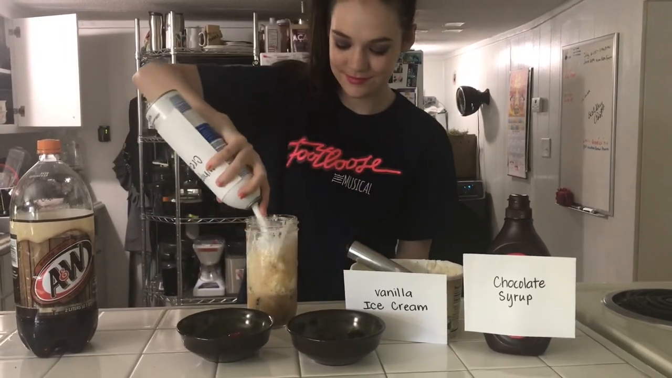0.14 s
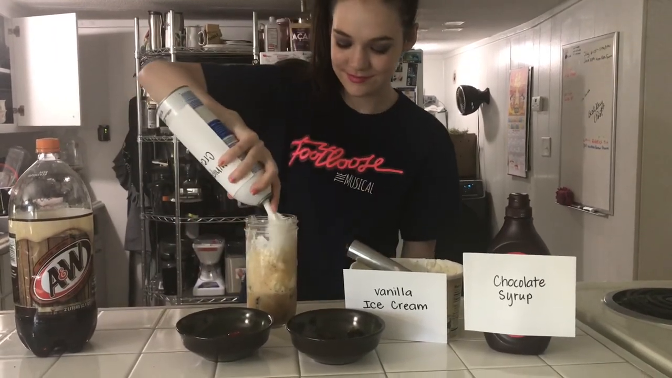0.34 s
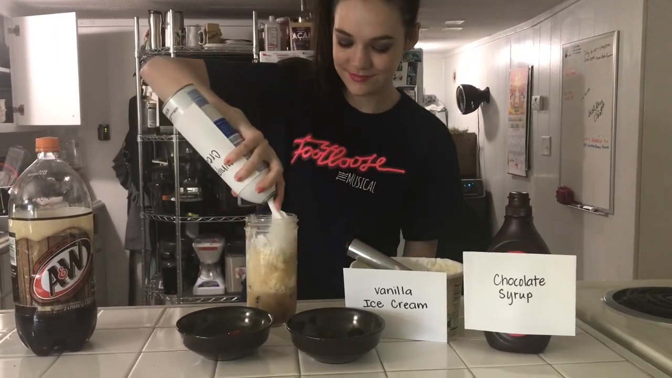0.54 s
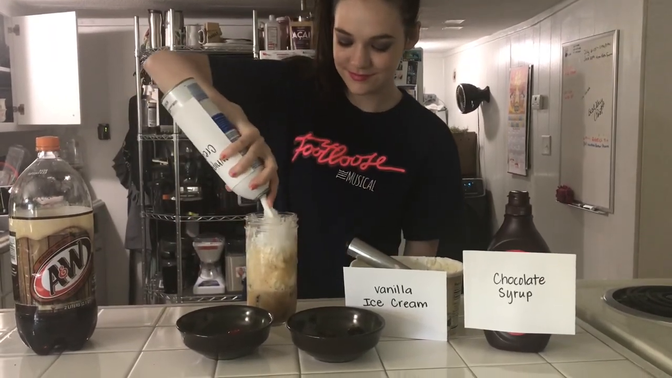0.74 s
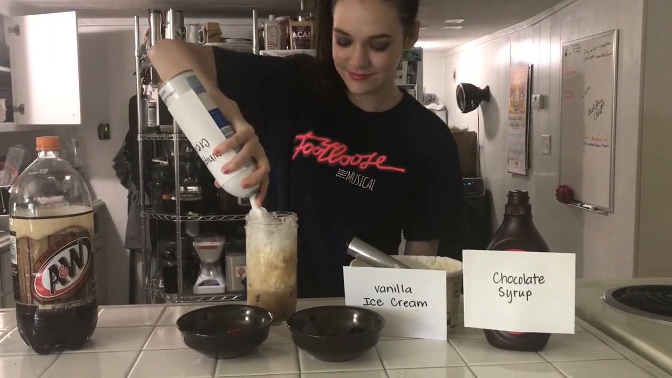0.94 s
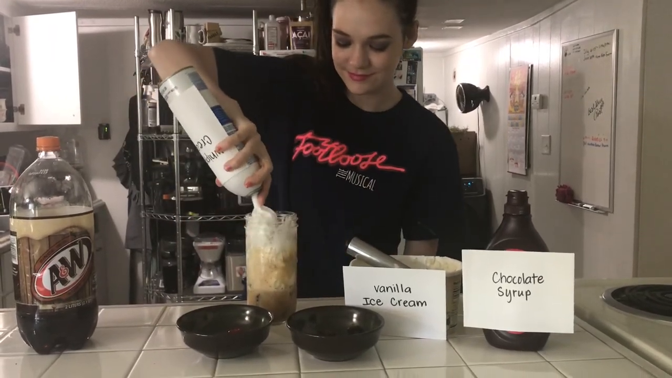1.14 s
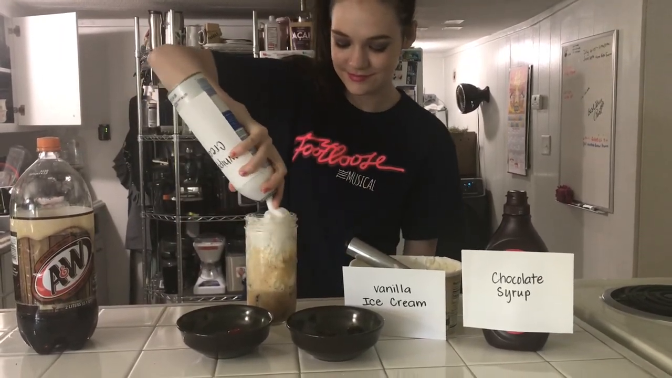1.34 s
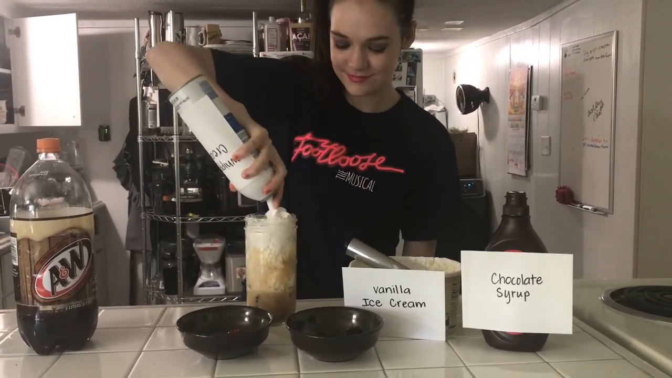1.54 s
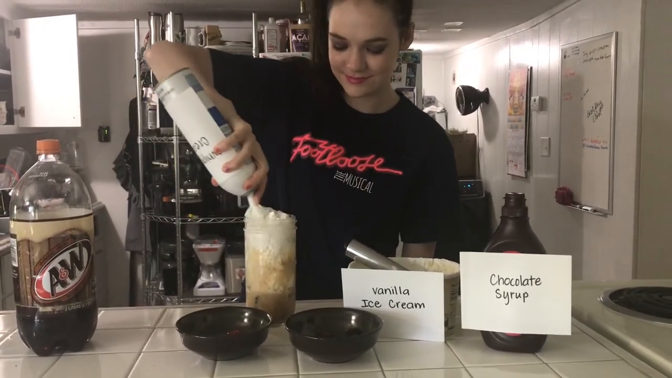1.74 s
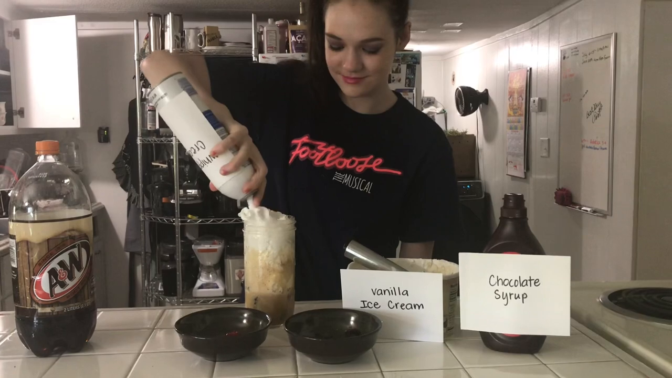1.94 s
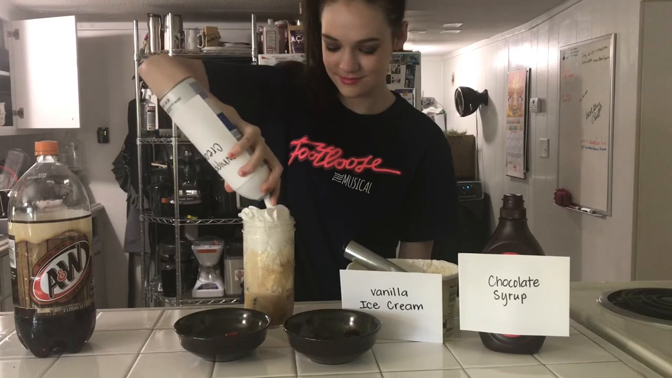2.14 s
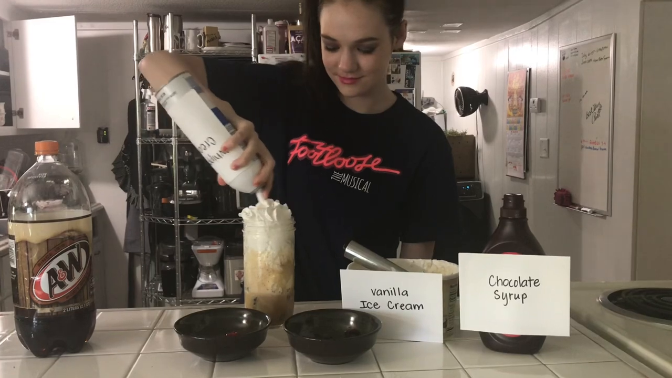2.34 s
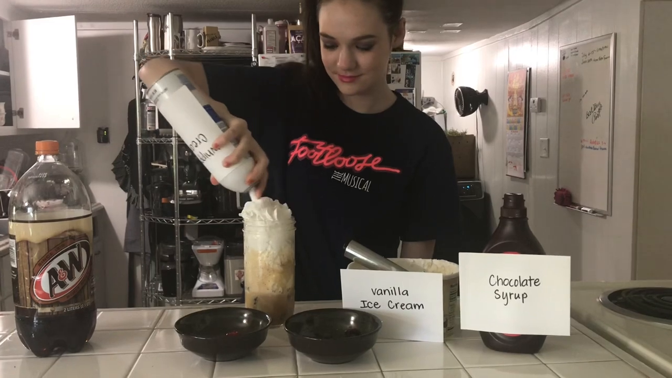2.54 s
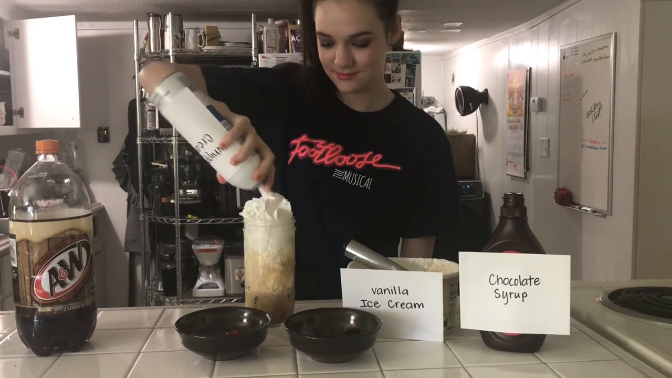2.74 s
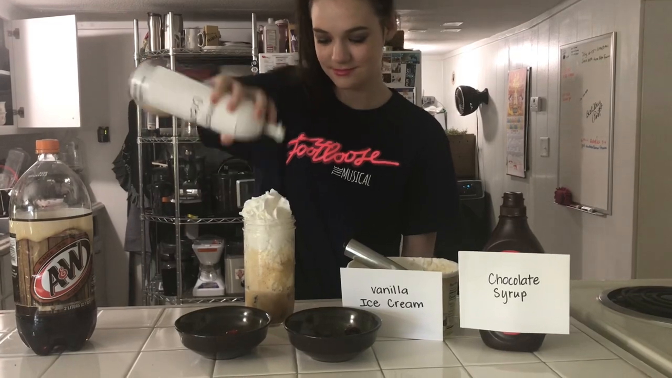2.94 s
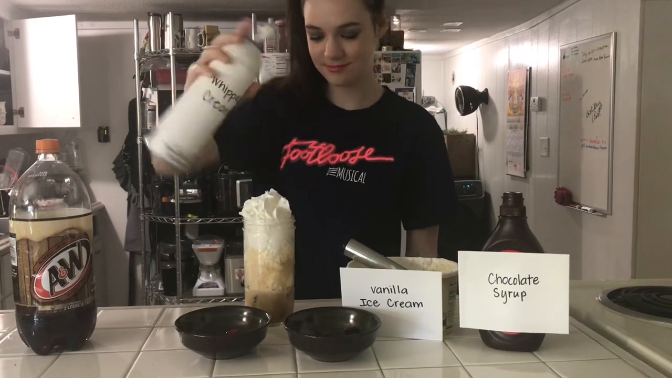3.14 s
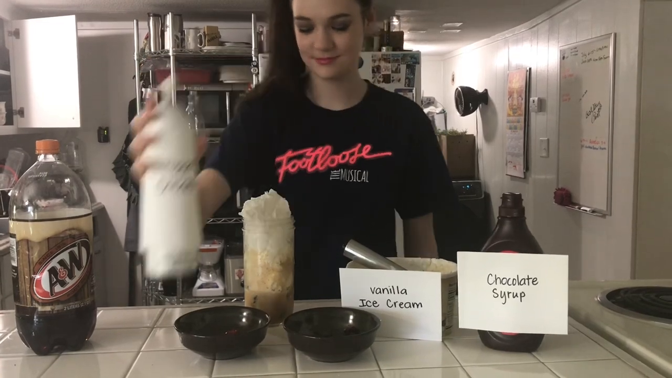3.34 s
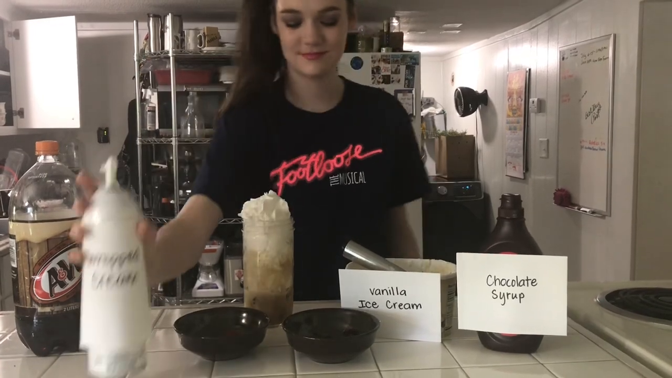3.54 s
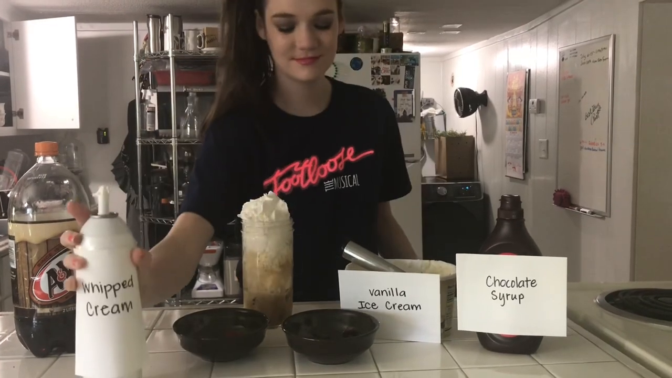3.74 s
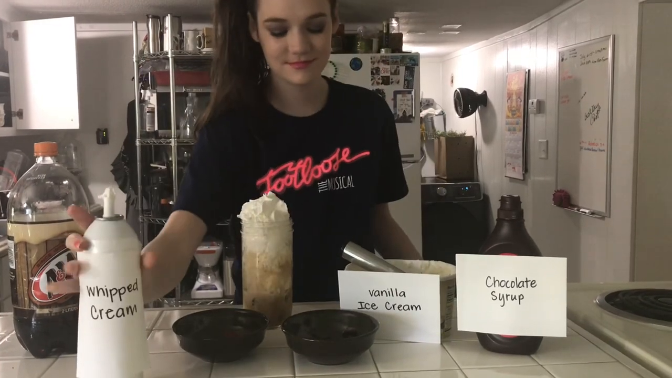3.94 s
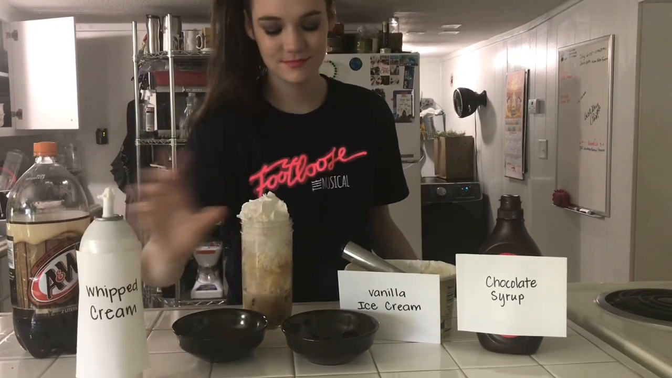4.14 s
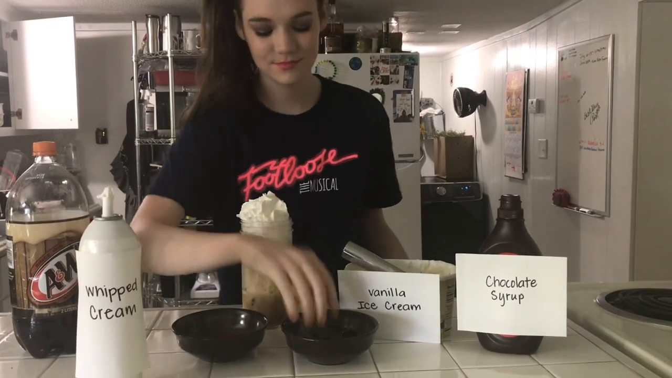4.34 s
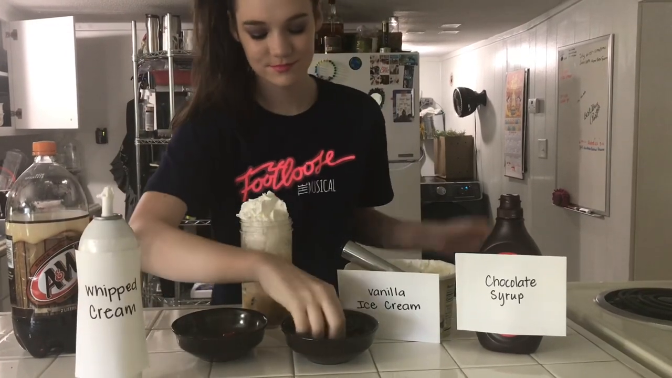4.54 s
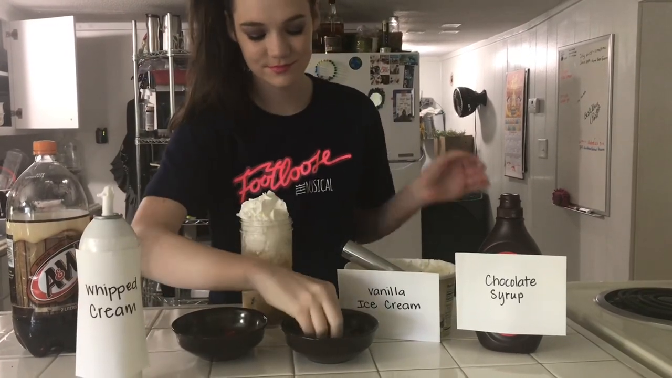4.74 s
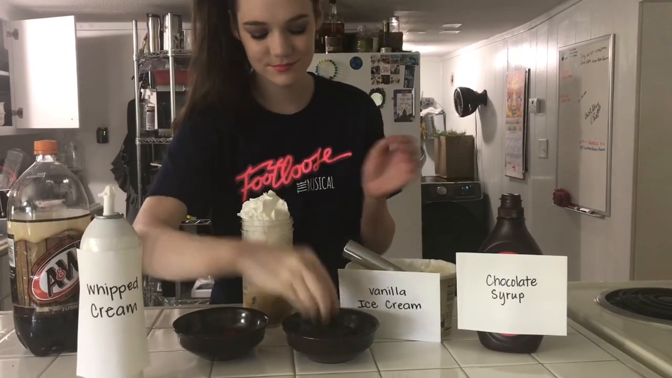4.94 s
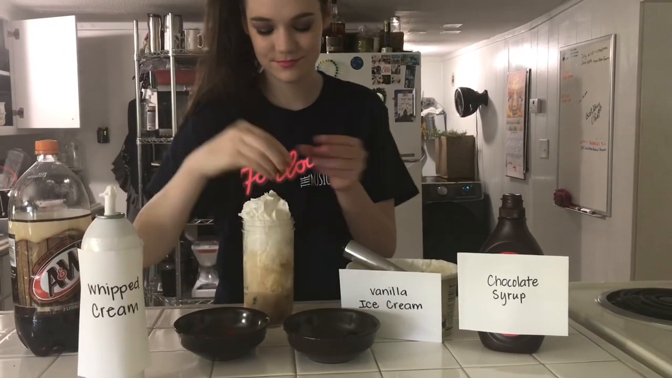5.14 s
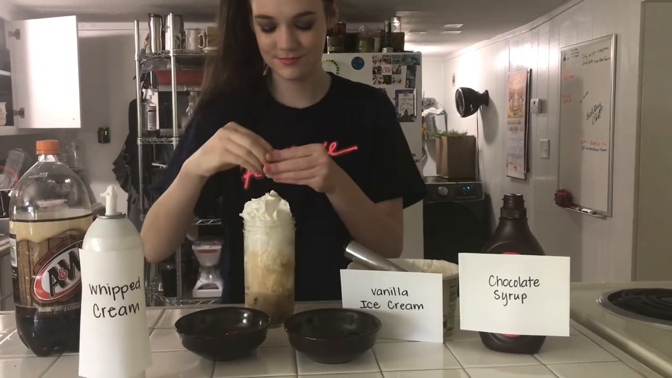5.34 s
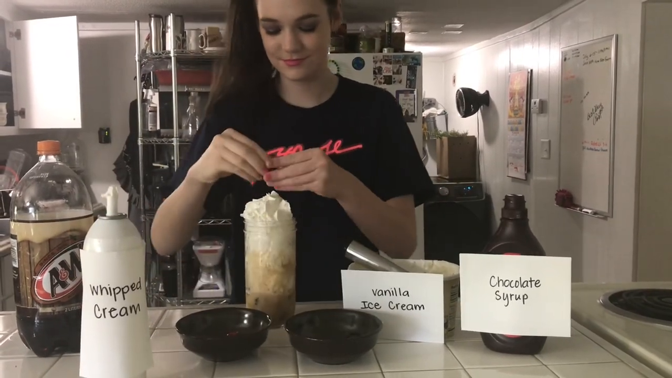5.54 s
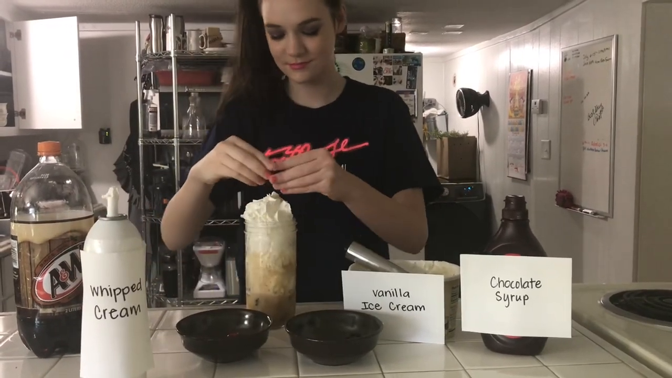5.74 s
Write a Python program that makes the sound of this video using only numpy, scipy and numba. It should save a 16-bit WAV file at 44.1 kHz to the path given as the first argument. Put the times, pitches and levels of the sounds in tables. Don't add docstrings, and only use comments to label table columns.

```python
import sys
import numpy as np
from scipy import signal
from scipy.fft import rfft, irfft, next_fast_len
from scipy.io import wavfile
from numba import njit

SR = 44100
rng = np.random.default_rng(int(sys.argv[2]) if len(sys.argv) > 2 else 0)


def to_wav(sig):
    pcm = np.clip(np.atleast_2d(sig), -1, 1) * 32767
    pcm = np.round(pcm).astype(np.int16)
    wavfile.write(sys.argv[1], SR, pcm.T)


def magnitude_from_level(level_db):
    exponent = np.asarray(level_db, float) / 20
    return 10 ** exponent


N = 259749


def rms_one(x):
    return x / np.sqrt(np.mean(x ** 2) + 1e-20)


def at_hz(points, hz):
    table_hz, values = np.transpose(points)
    return np.interp(np.log(hz + 1), np.log(table_hz), values)


def bumps_db(peaks, hz):
    return sum(db / (1 + (2 * (hz - centre) / width) ** 2) for centre, width, db in peaks)


def filtered(x, order, hz, kind="low"):
    return signal.sosfilt(signal.butter(order, hz, kind, fs=SR, output="sos"), x)


def coloured(x, gain_at):
    size = next_fast_len(len(x))
    hz = np.arange(size // 2 + 1) * SR / size
    return irfft(rfft(x, size) * gain_at(hz), size)[:len(x)]


def drift(rate_hz, size=N):
    r = np.exp(-2 * np.pi * rate_hz / SR)
    settle = 20000
    wander = signal.lfilter([1], [1, -2 * r, r * r], rng.standard_normal(size + settle))
    return rms_one(wander[settle:])


def strike(times_s, levels_db, modes, contact_hz=15000, swing=-1):
    at = (np.array(times_s) * SR).astype(int)
    span = SR // 2
    clicks = np.full(span, 1e-18)
    clicks[at - at[0]] = magnitude_from_level(levels_db)
    rings = 0
    for k, (hz, db, t60_s) in enumerate(modes):
        r, w = magnitude_from_level(-60 / (t60_s * SR)), 2 * np.pi * hz / SR
        gain = swing ** k * magnitude_from_level(db) * np.sin(w)
        rings = rings + signal.lfilter([0, gain], [1, -2 * r * np.cos(w), r * r], clicks)
    out = np.zeros(N)
    out[at[0]:at[0] + span] = filtered(rings, 2, min(contact_hz, 20000))
    return out


@njit
def moving_resonance(x, cos_w, r):
    y = np.zeros(len(x))
    for i in range(2, len(x)):
        drive = (1 - r * r) / 2 * (x[i] - x[i - 2])
        y[i] = drive + 2 * r * cos_w[i] * y[i - 1] - r * r * y[i - 2]
    return y


# hz, density_db
HUM_COLOUR = [(18, -34.5), (32, -6), (45, -1.5), (130, -3.5), (250, -6.5), (340, -9.5), (520, -17),
              (950, -12.5), (1400, -17.5), (2300, -20), (4400, -29), (5500, -33), (9000, -36),
              (16500, -42.5)]


def hum():
    air = rms_one(coloured(rng.standard_normal(N), lambda hz: magnitude_from_level(at_hz(HUM_COLOUR, hz))))
    mains_hz = 118
    tone = np.sin(2 * np.pi * mains_hz * np.arange(N) / SR + 1.94 * drift(3.9))
    air_db = -52 + 0.52 * drift(2.4)
    tone_db = -59.5 + 2 * drift(8.6)
    return magnitude_from_level(air_db) * air + magnitude_from_level(tone_db) * tone


# hz, t60_s
KITCHEN_T60 = [(100, .5), (500, .5), (1500, 0.49), (4000, 0.37), (8000, 0.28), (15000, 0.25)]
# hz, level_db
KITCHEN_COLOUR = [(100, -6.5), (1500, -2), (4000, -4.5), (8000, -1), (15000, -10)]


def kitchen(x):
    t = np.arange(SR // 2) / SR
    tail = 0
    edges_hz = 60 * 2 ** np.arange(10.)
    for low, high in zip(edges_hz, np.minimum(edges_hz[1:], 20000)):
        band = filtered(rng.standard_normal(len(t)), 2, [low, high], "band")
        hz = np.sqrt(low * high)
        tail = tail + band * magnitude_from_level(at_hz(KITCHEN_COLOUR, hz) - 60 * t / at_hz(KITCHEN_T60, hz))
    tail = tail * (1 - np.exp(-(t / 0.012) ** 2))
    return signal.fftconvolve(x, magnitude_from_level(-9) * tail / np.sqrt(np.sum(tail ** 2)))[:N]


# delay_s, level_db
ECHOES = [(.0045, -9.5), (0.0103, -11), (0.0121, -12.5), (0.0177, -11.5), (.0215, -18), (.028, -14)]


def wall_echoes(x):
    dull = filtered(x, 1, 6600)
    return sum(magnitude_from_level(db) * np.roll(dull, int(delay_s * SR)) for delay_s, db in ECHOES)


# start_s, ring_db, thud_db
TOUCHES = [
    (4.5765, -51.5, -38),
    (4.594, -70, -35.5),
    (4.599, -72, -33.5),
    (4.616, -69.5, -34),
    (4.657, -63, -57.5),
    (4.715, -66, -58.5),
]
# hz, level_db, t60_s
BOWL_MODES = [(6440, 4.5, 0.025), (6450, -20, 0.2), (8350, -3, 0.03), (8870, -5, 0.0182),
              (10756, -3, 0.0304), (12500, -3.5, 0.00403), (15000, 0.5, 0.00403)]
# hz, level_db, t60_s
THUD_MODES = [(161, -1, 0.019), (338, -4, 0.02112), (587, -4.5, 0.022), (940, 1, 0.016),
              (1424.1, 0.5, 0.024)]


def bowl():
    start_s, ring_db, thud_db = np.transpose(TOUCHES)
    ring = strike(start_s, ring_db, BOWL_MODES)
    return ring + strike(start_s, thud_db - 6.0, THUD_MODES, contact_hz=1699)


# time_s, level_db
SLIDE_STROKE = [
    (4.03, -73),
    (4.07, -50),
    (4.104, -73.5),
    (4.12, -68.5),
]


def slide():
    time_s, level_db = np.transpose(SLIDE_STROKE)
    grains = rng.standard_normal(N) * magnitude_from_level(2.583 * drift(300))
    rub = rms_one(filtered(grains, 3, 4600, "high"))
    return rub * magnitude_from_level(np.interp(np.arange(N) / SR, time_s, level_db, left=-120, right=-120))


# start_s, shell_db, shell_pitch_factor, counter_db, crack_db
KNOCKS = [
    (3.8234, -13.5, 1.001, -25, -17),
    (3.825, -24.5, 1.003, -37, -30),
    (3.9632, -35.5, 1.25, -46, -48),
    (3.9653, -25, 0.72, -28.5, -61.5),
]
# hz, level_db, t60_s
SHELL_MODES = [(1350, -5.5, 0.018), (1581.3, 2, 0.0079), (1870, 4.5, 0.0086), (2140, -2, 0.0141),
               (2800, -9, 0.0074), (4280, -10, 0.023), (6300, -3.5, 0.0053), (8400, 4, 0.0073)]
# hz, level_db, t60_s
COUNTER_MODES = [(60.1, -14, 0.24), (80, -11, 0.17), (119, -8, 0.28), (190.6, -8, 0.26),
                 (267.87, -4.5, 0.064), (379, -13, 0.13), (483, -16.5, 0.076), (614, -6.5, 0.072),
                 (752, -14, 0.17), (884.4, -10, 0.17), (990, -9, 0.1), (1136, -8.5, 0.13),
                 (1410, -15, 0.19)]


def can_knocks():
    out, t = 0, np.arange(N) / SR
    grit = filtered(rng.standard_normal(N), 1, [4500, 8000], "band")
    for start_s, shell_db, pitch, counter_db, crack_db in KNOCKS:
        modes = [(hz * pitch, db, t60_s) for hz, db, t60_s in SHELL_MODES]
        shell = strike([start_s], [shell_db], modes, contact_hz=3300 * pitch, swing=0.9125)
        shell = filtered(shell, 2, 900 * pitch, "high")
        counter = strike([start_s], [counter_db], COUNTER_MODES, contact_hz=1787)
        crack_t60_s = 0.0032
        crack_fall_db = 60 * np.maximum(t - start_s, 0) / crack_t60_s
        crack = grit * (t >= start_s) * magnitude_from_level(crack_db - crack_fall_db)
        out = out - shell + counter + crack
    return out


# start_s, peak_db, centre_hz
POPS = [
    (3.2155, -40.5, 8500),
    (3.218, -49, 7160),
    (3.2225, -57, 6497),
    (3.2408, -46, 12000),
    (4.0633, -55, 12000),
    (4.65, -65, 14000),
]


def pops():
    out = 0
    for start_s, peak_db, hz in POPS:
        modes = [(0.48 * hz, -4, .002), (0.75 * hz, -2, .002), (hz, .1, .0015),
                 (min(1.6 * hz, 15500), -2, .0012)]
        out = out + strike([start_s], [peak_db + 6], modes)
    return out


# time_s, flow_db (as hiss), cream_share_db
FLOW = [
    (0, -38, -1),
    (.45, -36.5, 0),
    (.69, -39.5, -0.5),
    (1.1, -35.5, -.5),
    (1.52, -36, 1),
    (1.77, -40, 1.5),
    (2.1, -31.5, -1),
    (2.44, -37.5, .5),
    (2.65, -32, -3),
]
# hz, density_db
SPRAY_COLOUR = [(200, -4), (350, -2), (600, -0.5), (1200, -1), (1700, -4), (2800, 0), (4300, -2),
                (5300, -2.5), (6800, 3), (8500, 2.5), (10000, -5.5), (11800, -16.5), (14000, -17),
                (16500, -12.5)]
# hz, width_hz, boost_db
GLASS_CAVITIES = [(685, 110, 6.5), (925, 31, 10.5), (1157.2, 110, 6.5), (2016, 49, 4.5), (2440, 60, 5.5),
                  (3000, 99, 2), (4060, 700, 5), (5170, 524, -3), (6860, 954, -7)]
# start_hz,
# sag_hz_per_s (negative sinks), boost_db, extra_at_first_db, fade_s, trend_db_per_s
RESONANCES = [
    (3303, -6, 1, 3.5, .3, -4),
    (9420, -350, 5, 4, 0.23, -2),
    (13800, -780, 3.5, -3, .3, -1),
    (6920, .1, 14, -17, 0.62, -4.2),
    (1930, 28, -17.5, -5, .3, 5),
]
RESONANCE_WIDTHS_HZ = [356, 890, 2003, 449.5, 406]
ZONE_EDGES_HZ = [150, 1500, 5000, 10400, 17000]
# level_db, follows_flow, follows_cream, extra_at_first_db, foam_build_s, trend_db_per_s
ZONES = [
    (-41.5, 0.14, -0.19, -8, 0.2, -0.24),
    (-38, 0.72, 0.66, -10.5, 0.28, 0.56),
    (-35, .99, 1, 1.2, .3, 0.54),
    (-33.5, 0.53, -0.42, -2.5, .05, -1.85),
]


def spray(sputter_db, patch_db, burst_db, size):
    t = np.arange(size) / SR
    time_s, flow_db, cream_db = np.transpose(FLOW)
    mean_flow_db = -35.5
    flow_db = np.interp(t, time_s, flow_db - mean_flow_db)
    cream_db = np.interp(t, time_s, cream_db)

    rough_db = burst_db * drift(590.0, size) + sputter_db * drift(35.0, size)
    turbulence = rng.standard_normal(size) * magnitude_from_level(rough_db)
    jet = turbulence
    for k, (hz, sag, db, first_db, fade_s, trend) in enumerate(RESONANCES):
        boost_db = db + first_db * np.exp(-t / fade_s) + trend * t
        if k == 0:
            boost_db = boost_db + 1.5 * cream_db
        cos_w = np.cos(2 * np.pi * (hz + sag * t) / SR)
        r = np.exp(-np.pi * RESONANCE_WIDTHS_HZ[k] / SR)
        jet = jet + magnitude_from_level(boost_db) * moving_resonance(turbulence, cos_w, r)
    jet = coloured(jet, lambda hz: magnitude_from_level(at_hz(SPRAY_COLOUR, hz) + bumps_db(GLASS_CAVITIES, hz)))

    out, spectrum = 0, rfft(jet)
    hz = np.arange(size // 2 + 1) * SR / size
    for low, high, settings in zip(ZONE_EDGES_HZ, ZONE_EDGES_HZ[1:], ZONES):
        db, flow, cream, first_db, build_s, trend = settings
        edges_hz, zone = np.geomspace(low, high, 5), 0
        for a, b in zip(edges_hz, edges_hz[1:]):
            patch = irfft(spectrum / (1 + (a / (hz + 1)) ** 24) / (1 + (hz / b) ** 24), size)
            zone = zone + patch * magnitude_from_level(patch_db * drift(5.9, size))
        zone_db = db + flow * flow_db + cream * cream_db + first_db * np.exp(-t / build_s) + trend * t
        out = out + rms_one(zone) * magnitude_from_level(zone_db)

    shut_s, fall_s, easing_s = 2.845, 0.00314, 0.017
    out = out * magnitude_from_level(-6 * np.clip(1 + (t - shut_s) / easing_s, 0, 1))
    out = out * np.exp(-np.maximum(t - shut_s, 0) / fall_s)
    return np.pad(out, (0, N - size))


def scene():
    jet = magnitude_from_level(-2.0) * spray(sputter_db=0.83, patch_db=1.27, burst_db=1.37, size=3 * SR) + pops()
    path_shift_s = 0.00013 * drift(2.051)
    circling = np.interp(np.arange(N) + SR * path_shift_s, np.arange(N), jet)
    touches = can_knocks() + slide() + bowl()
    room = wall_echoes(touches) + kitchen(magnitude_from_level(2.5) * circling + magnitude_from_level(-1.0) * touches)
    return np.tile(jet + touches + room + hum(), (2, 1))


def band_limit(x):
    return signal.sosfilt(signal.butter(12, 17040, fs=SR, output="sos"), x)


# hz, width_hz, cut_db
NOTCHES = [(5000, 233.3, 0), (7610, 340.2, -7), (10540, 740, -8.5)]


def record(dry):
    heard = dry[0]
    for hz, width_hz, cut_db in NOTCHES:
        band = signal.lfilter(*signal.iirpeak(hz, hz / width_hz, fs=SR), heard)
        heard = heard - (1 - magnitude_from_level(cut_db)) * band
    heard = signal.sosfilt(signal.ellip(14, .5, 70, 15780, fs=SR, output="sos"), heard)
    mix = np.tile(heard, (2, 1))
    return band_limit(mix)


dry = scene()
out = record(dry)
to_wav(out)
```